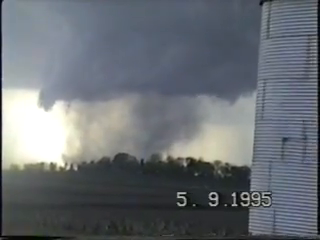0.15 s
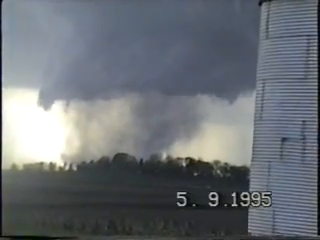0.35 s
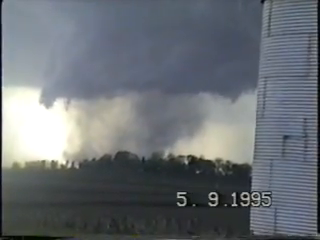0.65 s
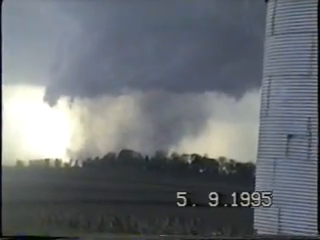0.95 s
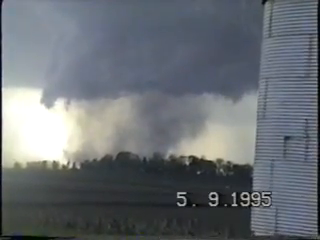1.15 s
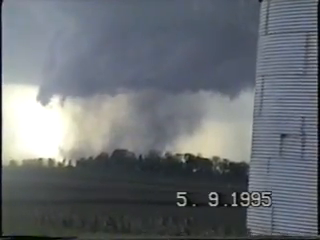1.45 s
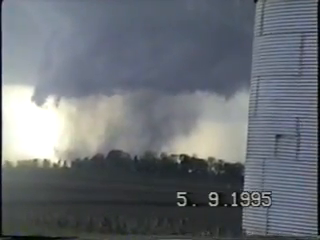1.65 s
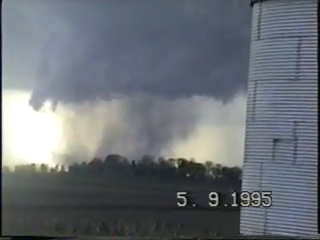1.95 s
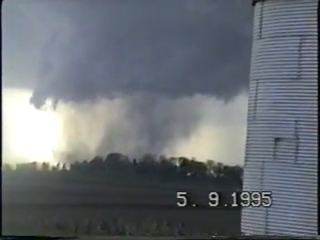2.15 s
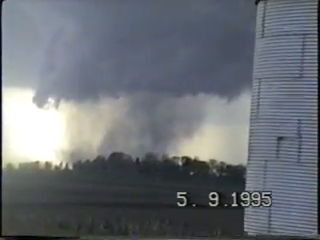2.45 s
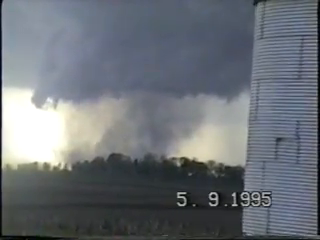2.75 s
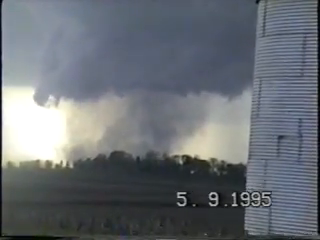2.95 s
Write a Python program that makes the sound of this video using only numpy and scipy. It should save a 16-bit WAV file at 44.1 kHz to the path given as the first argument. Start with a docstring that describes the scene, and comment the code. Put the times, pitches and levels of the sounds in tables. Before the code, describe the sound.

Storm wind batters a handheld camcorder microphone in an open field: rough low rumble, irregular thumps and slaps, short hollow hoots, with hard flurries at the start and just after one second, over faint hiss.

```python
"""Storm wind in an open field buffets the microphone of a tape camcorder, close and rough.
Shaped noise rushes and rumbles over the housing, with sharp slaps, deep thumps and a soft cavity drone.
The hardest buffets make the cavity hoot briefly, mostly near 220 Hz, as wavering tones with an overtone.
Underneath are tape hiss (noise), the faint buzz of the switching heads (ticks) and a thin whine (sines)."""
import sys
import numpy as np
from scipy import signal
from scipy.fft import rfft, irfft
from scipy.io import wavfile
from scipy.ndimage import uniform_filter1d

SR = 44100
rng = np.random.default_rng(int(sys.argv[2]) if len(sys.argv) > 2 else 0)


def wav_record(signal):
    """Record a signal, one row per channel, as 16-bit PCM in the file named by sys.argv[1]."""
    frames = np.transpose(np.atleast_2d(signal))
    bounded = np.clip(frames, -1, 1)
    # unit amplitude maps onto the largest positive 16-bit level
    quanta = np.round(bounded * 32767).astype(np.int16)
    wavfile.write(sys.argv[1], SR, quanta)


N = 136710

# wind force at the microphone: t/s, level/dB (before each layer's own trim)
WIND_FORCE = [(0, -31), (.04, -32.5), (.1, -37), (.2, -38.5), (.295, -36.5), (.325, -45.5), (.375, -40.5),
              (.41, -35.5), (.6, -38), (.92, -37), (1.1, -33.5), (1.18, -27.5), (1.245, -33.5),
              (1.315, -36), (1.35, -45.5), (1.46, -37), (1.51, -43.5), (1.62, -41), (1.7, -40),
              (1.92, -39.5), (1.99, -31.5), (2.14, -33.5), (2.2, -35), (2.3, -29), (2.4, -41),
              (2.47, -34.5), (2.56, -39), (2.6, -33.5), (2.68, -35.5), (2.86, -39), (3.1, -43)]
# colour of the turbulence: f/Hz, relative density/dB
RUSH_COLOUR = [(60, -33.5), (130, -9), (220, -0.5), (320, -2.5), (520, -4), (900, -11.5), (1400, -22.5),
               (1900, -30), (2500, -47.5), (4000, -78.5), (12000, -98.5)]
# resonances of the housing: f/Hz, width/Hz, lift/dB
HOUSING_MODES = [(231, 91, 7), (440, 89, 5.5), (690, 110, 4.5), (892, 55, 5.5), (1265, 25, 4)]
EDDY_RATE, FLUTTER_RATE = 39, 193  # rough changes per second
FLUTTER_DB = 2  # rms swing


def undb(db):
    """Decibels to gain."""
    return 10 ** (np.asarray(db) / 20)


def unit(x):
    """Scale to rms 1."""
    return x / np.sqrt(np.mean(x ** 2) + 1e-18)


def curve(rows):
    """A table of (t/s, value) joined by straight lines."""
    return np.interp(np.arange(N) / SR, *np.array(rows).T)


def walk(rate):
    """Smooth chance with rms 1, changing about rate times a second."""
    k = max(int(SR / rate), 1)
    once = uniform_filter1d(rng.standard_normal(N), k, mode="wrap")
    return unit(uniform_filter1d(once, k, mode="wrap"))


def colour(x, points, peaks=()):
    """Causal filter from a spectrum of (f/Hz, dB) points and resonances (f/Hz, width/Hz, lift/dB); rms 1."""
    f = np.maximum(np.arange(N // 2 + 1) * SR / N, 1)
    hz, db = np.array(points).T
    shape = np.interp(np.log(f), np.log(hz), db)
    for centre, width, lift in peaks:
        shape = shape + lift / (1 + (2 * (f - centre) / width) ** 2)
    # folding the cepstrum forward in time gives minimum phase
    cepstrum = irfft(np.log(undb(shape)), N)
    cepstrum[1:N // 2] *= 2
    cepstrum[N // 2 + 1:] = 0
    return unit(irfft(rfft(x) * np.exp(rfft(cepstrum)), N))


def veering(before, after):
    """Hand over from one sound to the other as the wind changes direction."""
    middle_s, lasts_s = 1.6, 0.16
    veer = np.clip((np.arange(N) / SR - middle_s) / lasts_s + .5, 0, 1)
    return (1 - veer) * before + veer * after


def tape():
    """Hiss, a tiny tick at each switch of the heads, and a thin whine of three unsteady tones."""
    # colour of hiss and ticks: f/Hz, relative density/dB
    hiss_colour = [(500, -1), (2800, -4.5), (4000, -2), (5500, 1.5), (7000, -1), (8000, -4), (9000, -9.5),
                   (11000, -13.5), (13300, -16.5)]
    # whine pitches: f/Hz
    whine_hz = [7134, 7851.5, 7911.5]
    # strength and unsteadiness of each whine: level/dB, rms waver/Hz
    whine_levels = [(-77, 4.7), (-76, 0.55), (-80, 0.46)]
    hiss_db, buzz_db = -59.5, -66.5
    switch_hz, first_tick_s, tick_s = 59.94, 0.0018, 0.00058
    t = np.arange(N) / SR
    since_first = t - first_tick_s
    ticks = rng.standard_normal(N) * (since_first % (1 / switch_hz) < tick_s)
    steps = np.diff(np.floor(since_first * switch_hz), prepend=-1)  # one click per switch
    buzz = colour(unit(steps) + 0.24 * unit(ticks), hiss_colour)
    whine = np.zeros(N)
    for hz, (db, waver) in zip(whine_hz, whine_levels):
        cycles = np.cumsum(hz + waver * walk(22)) / SR
        whine += undb(db) * np.sqrt(2) * np.sin(2 * np.pi * cycles)
    hiss = colour(rng.standard_normal(N), hiss_colour)
    return undb(hiss_db) * hiss + undb(buzz_db) * buzz + whine


def cavity():
    """The passing air keeps the cavity droning softly, as resonated noise that is louder as the wind rises."""
    drone_hz, width_hz, drone_db = 223.4, 94, -34.5
    follow = 0.33  # dB of drone per dB of wind
    b, a = signal.iirpeak(drone_hz, drone_hz / width_hz, fs=SR)
    once = signal.lfilter(b, a, rng.standard_normal(N))
    drone = unit(signal.lfilter(b, a, once))
    gust = curve(WIND_FORCE)
    return undb(drone_db + follow * (gust - gust.mean())) * drone


def rumble():
    """Large eddies push on the diaphragm itself, deeper once the wind has veered."""
    # level of the deep rumble: t/s, level/dB (before the trim)
    rumble_level = [(0, -44), (.1, -39.5), (.16, -39), (.26, -26.5), (.34, -42.5), (.55, -36), (.85, -39.5),
                    (1.0, -36), (1.25, -35), (1.38, -41), (1.68, -40.5), (1.78, -31), (1.88, -35),
                    (1.95, -26), (2.2, -30.5), (2.48, -35), (2.6, -29.5), (2.8, -33.5), (3.1, -36)]
    # colour before the wind veers: f/Hz, relative density/dB
    deep_colour = [(15, -36), (30, -19), (52, -9), (115, 4), (170, -4.5), (260, -9), (500, -42.5),
                   (3000, -93)]
    # colour after it veers: f/Hz, relative density/dB
    veered_colour = [(15, -33.5), (30, -17), (52, 0), (100, 0.5), (135, 0), (170, 0.5), (260, -16.5),
                     (500, -49), (3000, -88)]
    trim_db = 0.5
    eddies = rng.standard_normal(N)
    heard = veering(colour(eddies, deep_colour), colour(eddies, veered_colour))
    return heard * undb(curve(rumble_level) + trim_db)


def thumps():
    """The largest eddies shove the diaphragm for a few slow cycles that swell and fade."""
    # deep thumps: t/s, level/dB, f/Hz
    thump_list = [(0.093, -19.5, 132), (1.218, -15.5, 110.5), (1.744, -26, 105), (1.834, -31, 90),
                  (1.911, -24, 139), (2.185, -22, 102), (2.602, -18.5, 148), (2.702, -19.5, 121),
                  (2.896, -19.5, 106), (3.046, -22.5, 93)]
    peak_s = 0.0084  # time from onset to the strongest point
    t, out = np.arange(N) / SR, np.zeros(N)
    for (start, db, hz), turn in zip(thump_list, rng.random(len(thump_list))):
        at = (t >= start) & (t < start + 10 * peak_s)
        age = t[at] - start
        swell = (age / peak_s * np.exp(1 - age / peak_s)) ** 2
        out[at] += undb(db) * swell * np.sqrt(2) * np.sin(2 * np.pi * (hz * age + turn))
    return out


def slaps():
    """Small fast eddies burst on the housing: a pressure kick and a flurry, each ringing at its own pitch."""
    # sharp slaps of air: t/s, level/dB (before the trim), ring f/Hz, flurry decay/s
    slap_list = [(.092, -19, 450, 0.0051), (.278, -17, 382, .006), (.292, -16.5, 350, 0.0043),
                 (.389, -25.5, 503, 0.02), (.432, -21.5, 373, 0.0079), (.53, -20, 1175, 0.0093),
                 (.576, -26, 640, 0.0045), (.647, -18, 332, .002), (.712, -23, 797, 0.0056),
                 (0.756, -21.5, 395, 0.0041), (.787, -21, 448, 0.0097), (.838, -26, 760, 0.0089),
                 (1.164, -19.5, 820, .008), (1.179, -18.5, 400, .008), (1.221, -17, 663, 0.0051),
                 (1.269, -15.5, 359, 0.0047), (1.302, -16, 327, .004), (1.318, -20, 644, 0.0041),
                 (1.417, -30, 462, 0.0057), (1.555, -19.5, 420, .004), (1.66, -23, 890, 0.0065),
                 (1.715, -29, 433, 0.017), (1.976, -24, 389, 0.02), (2.171, -25.5, 840, 0.032),
                 (2.199, -19, 614, .016), (2.276, -18, 393, 0.018), (2.297, -26, 885, 0.0079),
                 (2.36, -21, 400, 0.011), (2.58, -27, 390, .012), (2.831, -25.5, 426, 0.0088)]
    # colour of all slaps: f/Hz, relative density/dB
    slap_colour = [(60, -21.5), (200, 3.5), (400, 0.5), (900, -8), (1400, -15), (1900, -32), (2500, -46.5),
                   (4000, -77.5)]
    kick, attack_s, trim_db = 7.2, 0.00094, -1.5
    ring_q, ring_db = 11, 7
    t, burst = np.arange(N) / SR, np.zeros(N)
    for start, db, hz, decay in slap_list:
        age = t - start
        envelope = np.clip(age / attack_s, 0, 1) * np.exp(-np.abs(age) / decay)
        flurry = rng.standard_normal(N) * envelope + 1e-18
        flurry[int(start * SR)] += kick
        ring = signal.lfilter(*signal.iirpeak(hz, ring_q, fs=SR), flurry)
        burst += undb(db) * (flurry + undb(ring_db) * ring)
    return undb(trim_db) * np.std(burst) * colour(burst, slap_colour)


def edge():
    """Fine eddies add a thin rough hiss of air at the edge of the opening."""
    # colour of the edge hiss: f/Hz, relative density/dB
    edge_colour = [(300, -32), (800, 0), (1300, 3.5), (1700, -4.5), (2200, -18), (3000, -39.5), (6000, -66)]
    # its level: t/s, level/dB
    edge_level = [(0, -48), (.05, -38.5), (.125, -43), (.19, -43), (.29, -47.5), (.34, -58), (.46, -47),
                  (.535, -47), (.61, -49), (.67, -40.5), (.73, -52), (.765, -44), (.81, -46.5), (1.0, -45),
                  (1.18, -43.5), (1.32, -48), (1.35, -69), (1.46, -54), (1.52, -54.5), (1.73, -48.5),
                  (1.88, -54), (2.1, -43.5), (2.24, -47), (2.3, -52), (2.42, -50), (3.1, -52.5)]
    eddy_db = 2.5  # rms swing
    flutter = undb(FLUTTER_DB * walk(FLUTTER_RATE) + eddy_db * walk(EDDY_RATE))
    return colour(rng.standard_normal(N) * flutter, edge_colour) * undb(curve(edge_level))


def buffets():
    """Each buffet blows the cavity into a short wavering hoot with an overtone, and a puff of turbulence."""
    # hard buffets: t/s, length before release/s, level/dB (before hoot and puff trims), f/Hz,
    # overtone/dB relative to the hoot
    buffet_list = [(.094, 0.0088, -16, 246, -5.5), (.132, 0.006, -11, 250, -20),
                   (0.148, 0.005, -22.5, 256, -11), (.168, 0.0065, -20, 260, -22),
                   (0.225, 0.018, -15, 234.4, -13.5), (0.258, 0.013, -18, 259, -22),
                   (0.282, 0.019, -19, 227.5, -14), (.298, 0.0047, -10, 245, -14),
                   (0.475, 0.0077, -14, 227, -34), (0.548, 0.016, -14, 229, -17),
                   (0.569, 0.006, -20, 236, -27), (.594, 0.0072, -18, 228, -25),
                   (0.759, 0.0083, -19, 250, -12), (.949, 0.03, -16.5, 220.2, -18),
                   (1.046, 0.019, -14.5, 229, -21), (1.085, 0.026, -18.5, 218, -15),
                   (1.186, 0.019, -14, 212.6, -15.5), (1.288, 0.019, -18, 231.5, -28),
                   (1.316, .014, -13, 223, -11.5), (1.415, 0.014, -21.5, 229, -5),
                   (1.553, 0.015, -24, 232, -1), (1.662, 0.019, -22, 231.4, -18),
                   (2.129, 0.0092, -17, 172, -16), (2.331, 0.044, -14.5, 191.7, -7),
                   (2.394, 0.0055, -23, 210, -21), (2.438, .034, -18.5, 219.3, -19.5),
                   (2.525, 0.03, -18.5, 212, -10), (2.57, 0.046, -23.5, 214.6, -8),
                   (2.622, 0.011, -13, 228, -21), (2.64, 0.018, -23.5, 276, -11),
                   (2.862, 0.017, -22.5, 231, -5.5)]
    attack_s, release_s, sag_db_per_s = 0.0025, 0.0055, 105.5
    hoot_db, puff_db, overtone_ratio = -2, -14.5, 1.94
    pitch_waver = 0.078  # rms, as a share of the pitch
    t, out = np.arange(N) / SR, np.zeros(N)
    wavering_time = np.cumsum(1 + pitch_waver * walk(210)) / SR
    puff = undb(puff_db) * colour(rng.standard_normal(N), RUSH_COLOUR, HOUSING_MODES)
    for start, length, db, hz, overtone_db in buffet_list:
        at = (t >= start) & (t < start + length + 10 * release_s)
        age = t[at] - start
        attack = np.minimum(age / attack_s, 1)
        release = np.exp(-np.maximum(age - length, 0) / release_s)
        envelope = attack * release * undb(-sag_db_per_s * age)
        phase = 2 * np.pi * hz * (wavering_time[at] - wavering_time[at][0])
        overtone = undb(overtone_db) * np.sin(overtone_ratio * phase)
        hoot = np.sqrt(2) * (np.sin(phase) + overtone)
        out[at] += undb(db) * envelope * (undb(hoot_db) * hoot + puff[at])
    return out


def rush():
    """Turbulence that flutters with each eddy, coloured by the side of the housing that it strikes."""
    # colour after the wind veers to another side of the housing: f/Hz, relative density/dB
    veered_colour = [(60, -16.5), (130, -5.5), (220, -3.5), (320, -5), (520, -14.5), (900, -16),
                     (1400, -23.5), (1900, -38.5), (2500, -47.5), (4000, -63.5), (12000, -68)]
    # resonances struck from that side: f/Hz, width/Hz, lift/dB
    veered_modes = [(213, 75, 9), (407.4, 90, 10.5), (612, 126, 13), (839, 106, 9), (1042, 50, 7),
                    (1213, 83, 9)]
    trim_db, eddy_db = 5, 1.52  # eddy_db is an rms swing
    flutter = undb(eddy_db * walk(EDDY_RATE) + FLUTTER_DB * walk(FLUTTER_RATE))
    eddies = unit(rng.standard_normal(N) * flutter)
    before = colour(eddies, RUSH_COLOUR, HOUSING_MODES)
    after = colour(eddies, veered_colour, veered_modes)
    return veering(before, after) * undb(curve(WIND_FORCE) + trim_db)


def scene():
    """All the wind at the microphone, as one channel."""
    return (cavity() + rumble() + thumps() + slaps() + edge() + buffets() + rush())[None]


def record(dry):
    """The microphone rounds the hardest peaks, the tape adds its noise, and the top is cut."""
    ceiling = undb(-9.5)
    top_hz = 13000
    rounded = ceiling * np.tanh(dry / ceiling)
    low_pass = signal.ellip(8, .2, 70, top_hz, fs=SR, output="sos")
    return signal.sosfilt(low_pass, rounded + tape())


dry = scene()
out = record(dry)
wav_record(out)
```